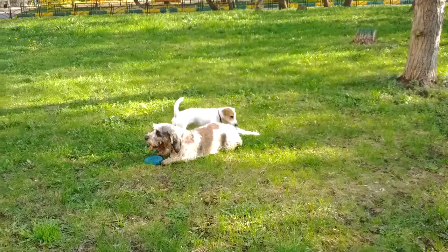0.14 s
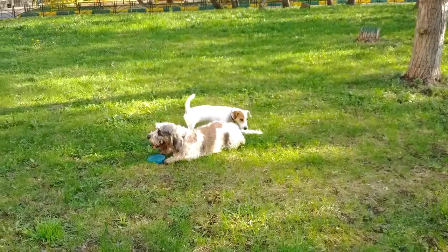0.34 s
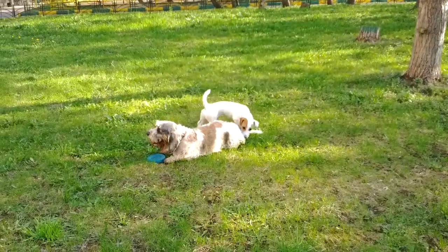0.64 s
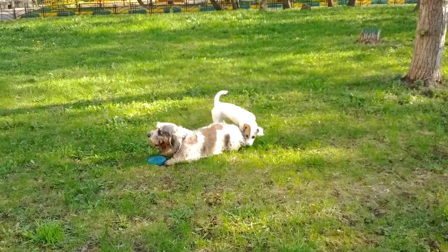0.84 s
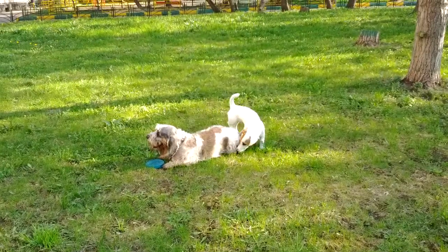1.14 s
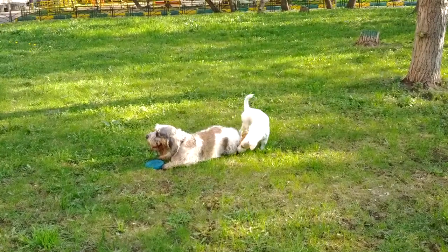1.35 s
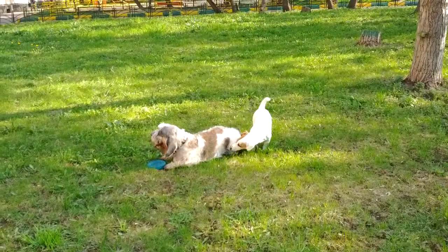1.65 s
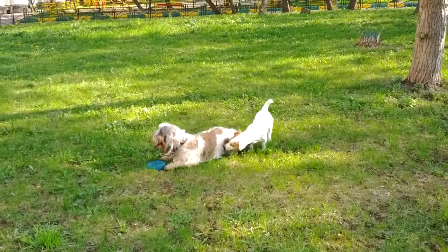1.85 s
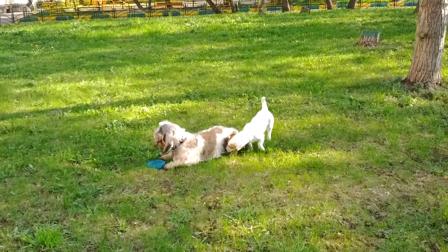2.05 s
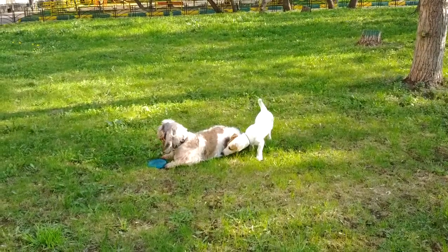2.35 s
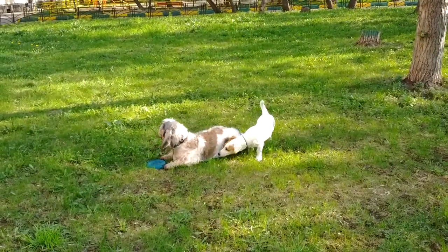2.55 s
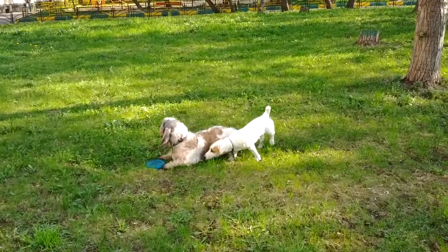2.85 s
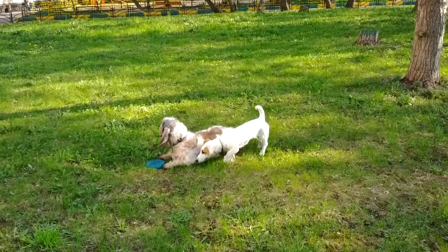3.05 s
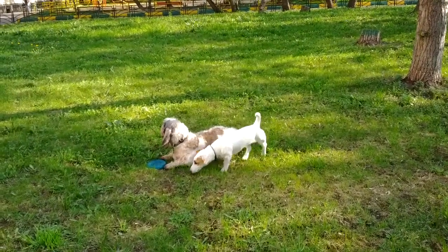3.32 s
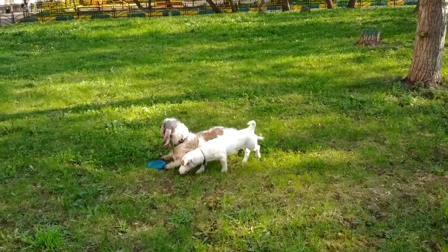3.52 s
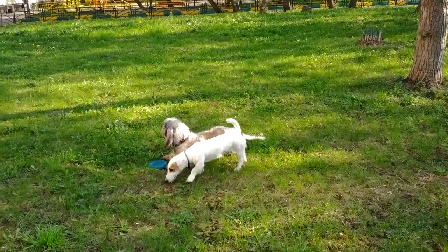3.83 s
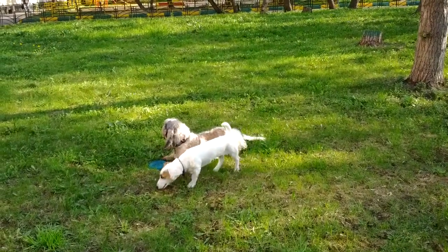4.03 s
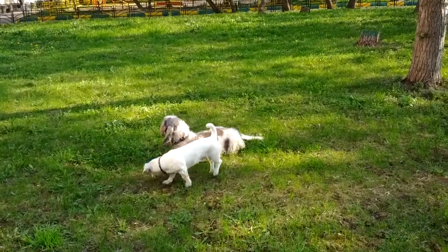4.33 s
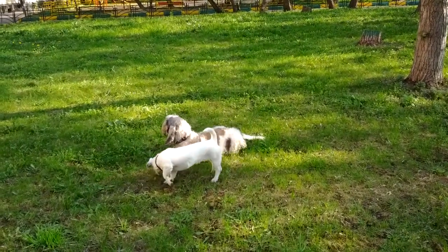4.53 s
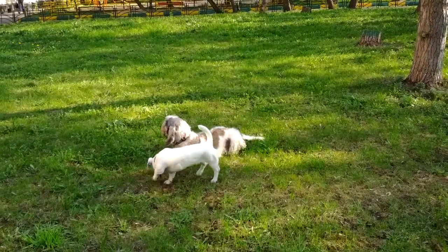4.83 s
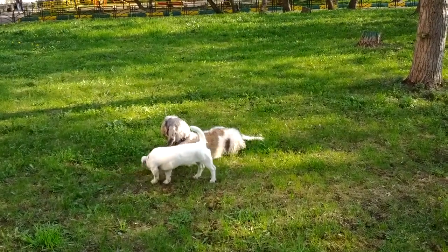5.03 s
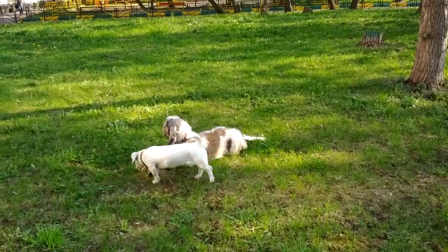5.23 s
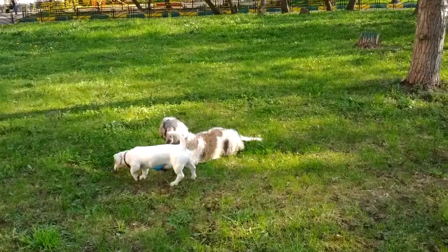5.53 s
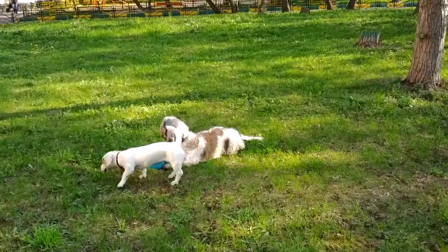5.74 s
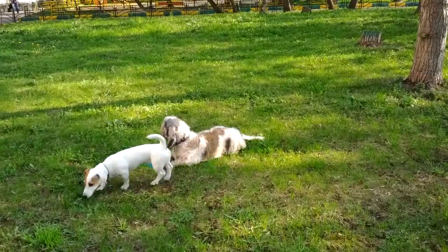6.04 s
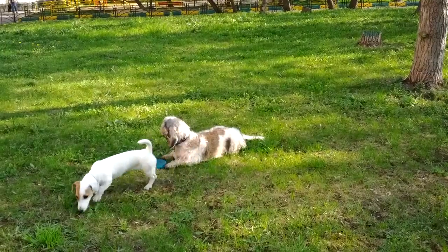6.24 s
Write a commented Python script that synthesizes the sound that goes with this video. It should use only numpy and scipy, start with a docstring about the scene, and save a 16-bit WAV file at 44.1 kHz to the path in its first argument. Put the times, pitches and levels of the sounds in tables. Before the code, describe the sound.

After a tiny silence, outdoor road noise opens: deep rumble, broad tyre roar and airy hiss. Two sparrow chirps sound at about 0.2 and 0.4 seconds. Vehicles pass close at roughly 0.7 and 1.4, their bright hiss overlapping, while another engine's midrange hum peaks near 1.2 and slides slightly down in pitch. A softer pass follows around 2.2. Beneath, a low exhaust drone climbs slowly, strong from 1.5 to 3.5, then falters after 4.3, nearly vanishes around 5, and returns a little lower near 5.8. Sparrows chatter in a quick cluster from 2.45 to 3.4, faintly at 4.0 and 4.3, then in an overlapping burst around 4.85, all with a short diffuse echo. Farther vehicles wash by more quietly to the end. Very faint grass rustles near 4.3, 4.9 and 6.2 and tiny bright ticks, notably at 2.0 and 6.05, come from the dogs. Mono, ending at about 6.4.

```python
"""A lawn in a park beside a road: traffic rumbles as shaped noise; two vehicles hiss past close by, more farther off.
An exhaust drones as a firing tone with overtones, rising slowly in pitch, then fades as the engine eases
off and returns lower; a second engine hums past with a Doppler fall. Sparrows chirp in the trees as gliding
whistles with echoes, and two dogs on the grass make faint ticks and rustles of noise. The sound is mono."""
import sys
import numpy as np
from scipy import signal
from scipy.fft import rfft, irfft, next_fast_len
from scipy.io import wavfile
from scipy.ndimage import uniform_filter1d, map_coordinates

SR = 44100
rng = np.random.default_rng(int(sys.argv[2]) if len(sys.argv) > 2 else 0)


def store_wav(level_fs):
    """Save 16-bit WAV to argv[1]."""
    pcm = np.round(np.clip(np.atleast_2d(level_fs), -1, 1) * 32767)
    wavfile.write(sys.argv[1], SR, pcm.T.astype(np.int16))


N = 281137  # length in samples
TIME_S = np.arange(N) / SR


def amp(db):
    """Level law: 20 dB is a factor of ten in amplitude."""
    return 10 ** (np.asarray(db) / 20)


def unit(x):
    """Normalisation by mean power: scale to rms 1."""
    return x / np.sqrt(np.mean(x ** 2) + 1e-20)


def along(points, hz):
    """Spectral interpolation: (Hz, value) points joined along a logarithmic frequency axis."""
    point_hz, values = np.transpose(points)
    return np.interp(np.log(hz + 1), np.log(point_hz + 1), values)


def curve(rows):
    """Linear interpolation: (s, value) points as one value per sample."""
    return np.interp(TIME_S, *np.transpose(rows))


def swell(closest_s, lasting_s):
    """Distance law of a source driving by: gain 1 when closest, half of that lasting_s before and after."""
    return 1 / (1 + ((TIME_S - closest_s) / lasting_s) ** 2)


def wobble(rate):
    """Random modulation: a smooth curve through normal random knots, rate of them a second."""
    knots = rng.standard_normal(int(N * rate / SR) + 4)
    return map_coordinates(knots, [np.arange(N) * rate / SR])


def filtered(x, response):
    """Linear filtering: the spectrum of x times a response of frequency."""
    m = next_fast_len(N + SR // 2)  # zero padding keeps the end from wrapping round
    spectrum = rfft(x, m) * response(np.fft.rfftfreq(m, 1 / SR))
    return irfft(spectrum, m)[..., :N]


def rush(spectrum, patchy_db):
    """Turbulent noise: coloured, of rms 1, with patches of gain in time and frequency from the moving air."""
    cells = signal.stft(rng.standard_normal(N), nperseg=512)[2]
    across_hz = uniform_filter1d(rng.standard_normal(cells.shape), size=5, axis=0)
    patches = unit(uniform_filter1d(across_hz, size=22, axis=1))
    noise = signal.istft(cells * amp(patchy_db * patches), nperseg=512)[1][:N]
    return unit(filtered(noise, lambda hz: amp(along(spectrum, hz))))


def band(centre_hz, width_hz):
    """Resonance: noise of rms 1 in one peak, width_hz across at half its amplitude."""
    noise = rng.standard_normal(N)
    return unit(filtered(noise, lambda hz: 1 / (1 + ((hz - centre_hz) / width_hz * 2) ** 2)))


def add(track, s, sound):
    """Superposition: mix a short sound into the track at time s."""
    room = track[max(round(s * SR), 0):][:len(sound)]
    room += sound[:len(room)]


# The distant stream of traffic slowly recedes; its rumble and hiss are relative to its roar.
STREAM_DB, STREAM_FADE_DB_PER_S = -44, 0.59
STREAM_RUMBLE_DB, STREAM_HISS_DB = 4.5, -9
# Vehicles going by. Each row: closest in seconds, time to half gain in seconds, rumble in dB, roar in dB,
# hiss in dB, nearness from 0 to 1 (the share of hiss power with the near colour).
VEHICLES = [(.68, 0.53, -48.5, -43.5, -39, 0.99), (1.4, 0.54, -42.5, -44.5, -39, 0.88),
            (2.2, 0.75, -46, -45.5, -45.5, 0.47), (3.05, 0.36, -47.5, -51.5, -53, 0),
            (3.87, 0.56, -56, -50, -49, 0.01), (4.8, 0.76, -56, -55.5, -51, 0.54),
            (5.68, 0.67, -47, -51.5, -53, 0.6)]


def road_levels():
    """Incoherent addition: in rumble, roar, near and far hiss, vehicles add in power to the stream."""
    stream = amp(STREAM_DB - STREAM_FADE_DB_PER_S * TIME_S)
    power = np.outer([amp(STREAM_RUMBLE_DB), 1, 0, amp(STREAM_HISS_DB)], stream) ** 2
    for closest_s, lasting_s, rumble_db, roar_db, hiss_db, nearness in VEHICLES:
        near_gain = amp(hiss_db) * np.sqrt(nearness)
        far_gain = amp(hiss_db) * np.sqrt(1 - nearness)
        gains = [amp(rumble_db), amp(roar_db), near_gain, far_gain]
        power = power + np.outer(gains, swell(closest_s, lasting_s)) ** 2
    return np.sqrt(power)


DEEP_DB = -46  # the deepest rumble carries from far off and stays level
# Noise colours of the deepest rumble, the rumble, the tyre roar, and tyre hiss close by and far off.
# Each row: frequency in Hz, relative density in dB per Hz.
DEEP_SPECTRUM = [(12, -24), (24, -5), (30, -6), (36, -11), (58, -5), (75, -21), (150, -60)]
RUMBLE_SPECTRUM = [(20, -22), (45, -8), (70, 0.5), (105, -0.5), (150, -1.5), (250, -5), (350, -10.5),
                   (500, -20.5), (900, -44.5)]
ROAR_SPECTRUM = [(200, -0.5), (500, -2), (780, 1), (1100, 1), (1450, 0), (1900, -4.5), (2600, -6.5),
                 (4000, -15.5), (8000, -47)]
NEAR_HISS_SPECTRUM = [(1060, -16), (1800, -6.5), (2120, -7.5), (2430, -4), (2760, -4.5), (3370, -1),
                      (4930, -5), (5650, -1.5), (7090, -3.5), (9140, -12.5), (11100, -11), (12700, -18.5),
                      (15800, -45)]
FAR_HISS_SPECTRUM = [(1060, -52), (1800, -22), (2200, -21), (2590, 4), (3160, -2.5), (3620, 1.5),
                     (4420, 1.5), (4800, 4), (5250, -0.5), (7020, 0.5), (8570, -12), (10700, -10.5),
                     (12800, -23), (15200, -26), (15800, -41)]


def traffic():
    """Broadband road noise: rumble and tyre roar, and a hiss that is brighter while a vehicle is near."""
    rumble_gain, roar_gain, near_gain, far_gain = road_levels()
    deep = amp(DEEP_DB) * rush(DEEP_SPECTRUM, patchy_db=0.0)
    rumble = rumble_gain * rush(RUMBLE_SPECTRUM, patchy_db=1.0)
    roar = roar_gain * rush(ROAR_SPECTRUM, patchy_db=0.82)
    near_hiss = near_gain * rush(NEAR_HISS_SPECTRUM, patchy_db=1.5)
    far_hiss = far_gain * rush(FAR_HISS_SPECTRUM, patchy_db=1.7)
    return deep + rumble + roar + near_hiss + far_hiss


# The overtones carry only while the engine is near, over a faint remainder.
THROB_S, THROB_LASTING_S, THROB_DB, THROB_FAR_DB = 1.35, 1.4, -40.5, -54
# The passing engine. Each row: time in seconds, firing rate in Hz.
FIRING_RATE = [(0, 42.8), (.6, 43.78), (1, 45.32), (1.5, 47.18), (2, 48.56), (2.7, 50.24), (3.4, 50.6),
               (4.2, 52.75), (4.9, 49.9), (5.5, 49.24), (6.37, 47.9)]
# The exhaust's fundamental. Each row: time in seconds, level in dB before it wavers.
DRONE_LEVEL = [(0.0, -34.5), (0.7, -43), (0.9, -34.5), (1.3, -34.5), (1.55, -30.5), (2.8, -31.5),
               (3.55, -33), (4.0, -39.5), (4.3, -32.5), (4.44, -46), (5.15, -51), (5.27, -39), (5.52, -42),
               (5.8, -34), (6.37, -35.5)]
# Exhaust colour. Each row: frequency in Hz, relative overtone level in dB.
PIPE_COLOUR = [(90, 0.5), (140, -3), (190, -6), (240, -8), (290, -14), (400, -24), (600, -28)]


def exhaust(waver_db=-53, scatter_db=3, smear=0.19):
    """Harmonic series on the firing rate; overtones fade in and out as the paths from the road shift."""
    firing_hz = curve(FIRING_RATE)
    phase = 2 * np.pi * np.cumsum(firing_hz) / SR
    # an added waver of fixed size shows most where the tone is weak
    drone_gain = amp(curve(DRONE_LEVEL)) + amp(waver_db) * wobble(10)
    drone = drone_gain * unit(np.sin(phase))
    overtones = np.zeros(N)
    for k in range(2, 12):
        gain = amp(along(PIPE_COLOUR, k * firing_hz) + scatter_db * wobble(4.85))
        drift = smear * np.sqrt(k) * wobble(9.8)  # radians
        overtones += gain * np.sin(k * phase + rng.uniform(0, 2 * np.pi) + drift)
    throb_gain = np.hypot(amp(THROB_DB) * swell(THROB_S, THROB_LASTING_S), amp(THROB_FAR_DB))
    return drone + throb_gain * unit(overtones)


# Narrow bands, engine booms low and tyre tread high. Each row: centre in Hz, width in Hz,
# level when loudest in dB, loudest at in seconds, time to half gain in seconds.
PASSING_BANDS = [(102.3, 28, -47, 5.7, 2.6), (174, 29, -44, 0.41, 0.26), (205, 78, -44.5, 2.09, 0.39),
                 (185, 75, -45.5, 3.79, 0.27), (134, 45, -45.5, 3.23, 0.31), (280, 61, -47, 0.63, 0.52),
                 (392, 137, -47, 0.29, 0.69), (1200, 450, -48.5, 1.0, 0.21), (2480, 280, -51, 0.63, 0.22),
                 (2450, 380, -47, 1.45, 0.57), (4740, 300, -62, 4.8, 0.81), (5600, 700, -51, 0.71, 0.15)]


def passing():
    """Resonance and distance: each narrow band swells and fades as its vehicle goes by."""
    return sum(amp(db) * band(hz, width_hz) * swell(closest_s, lasting_s)
               for hz, width_hz, db, closest_s, lasting_s in PASSING_BANDS)


HUM_HZ, HUM_DB = 232.5, -44  # pitch and level when closest
HUM_DOPPLER = .04  # share by which the pitch is raised far ahead and lowered far behind
HUM_S, HUM_LASTING_S = 1.15, 0.665  # closest at, time to half gain


def second_engine(smear=0.56, flutter_db=2.5):
    """Doppler effect: an unsteady hum sinks in pitch as its vehicle goes by, swelling when closest."""
    ahead = (HUM_S - TIME_S) / HUM_LASTING_S
    approach = ahead / np.hypot(1, ahead)  # share of the speed directed at the listener
    pitch_hz = HUM_HZ * (1 + HUM_DOPPLER * approach)
    phase = 2 * np.pi * np.cumsum(pitch_hz) / SR + smear * wobble(14)
    hum = unit(np.sin(phase) * amp(flutter_db * wobble(9.8)))
    return amp(HUM_DB) * swell(HUM_S, HUM_LASTING_S) * hum


# The sparrows' four notes, by name. Each row: time after the note's start in seconds,
# nominal pitch in Hz, relative level in dB.
NOTES = { "chilip": [(0, 4800, -15), (.005, 5300, -10), (.008, 5900, -2), (.011, 5400, -9),
         (.014, 4400, -17), (.022, 4270, -6), (.033, 4130, 0), (.038, 3900, -6), (.043, 3500, -18),
         (.049, 3550, -24), (.055, 3750, -8), (.064, 4080, -2), (.069, 4400, -14), (.073, 3950, -7),
         (.082, 3350, -13)], "cheerup": [(0, 3650, -14), (.005, 4150, -6), (.013, 4750, -4),
         (.023, 4550, -1), (.029, 4750, -6), (.032, 5350, -9), (.035, 4200, -6), (.039, 3600, -5),
         (.044, 3900, -22), (.048, 4250, -13), (.054, 3600, -14), (.061, 3150, -13), (.068, 3250, -17),
         (.073, 3600, -6), (.078, 3850, -1), (.082, 4250, -15), (.086, 3800, -10), (.091, 3050, -14),
         (.099, 3300, -15)], "tsip": [(0, 5630, -20), (.005, 6200, -5), (.009, 6700, -14),
         (.02, 6800, -20)], "tsew": [(0, 5830, -9), (.006, 5700, -1), (.016, 5200, -7), (.026, 5130, -22),
         (.034, 4950, -5), (.04, 4500, -12)], }
# The sparrows' calls. Each row: start in seconds, level in dB, echo relative to the call in dB,
# growth over the call in dB, note name.
CHIRPS = [(0.186, -41, -10, 2, "cheerup"), (0.357, -38, -12, -6, "chilip"), (2.45, -38, -7, 0, "chilip"),
          (2.799, -36, -8, 0, "tsip"), (2.857, -37.5, -8, 3, "cheerup"), (3.043, -37.5, -5, 0, "chilip"),
          (3.08, -45, -7, 0, "tsew"), (3.366, -36, -6, 0, "tsip"), (4.02, -48, -6, 2, "chilip"),
          (4.308, -46.5, -6, 4, "chilip"), (4.84, -40.5, -3, -2, "chilip"), (4.881, -46, -4, 0, "tsew"),
          (4.899, -42.5, -3, 3, "cheerup")]


def sparrows(overtone_db=-16, echo_t60=0.45, echo_delay_s=.008, flutter_db=2.0):
    """Frequency modulation: fluttering, gliding whistles with weak overtones, scattered by trunks and walls."""
    song = np.zeros(N)
    tail_t = np.arange(SR // 2) / SR
    for start_s, db, echo_db, growth_db, note in CHIRPS:
        knots_s, pitch_hz, shape_db = np.transpose(NOTES[note])
        t = np.arange(int(knots_s[-1] * SR)) / SR
        detune = 1 + 0.0046 * rng.standard_normal()  # each call lies slightly off pitch
        phase = 2 * np.pi * np.cumsum(np.interp(t, knots_s, pitch_hz)) / SR * detune
        overtones = np.sin(2 * phase) + .5 * np.sin(3 * phase)
        whistle = np.sin(phase) + amp(overtone_db) * overtones
        flutter = flutter_db * wobble(294)[:len(t)]
        level_db = db + np.interp(t, knots_s, shape_db) + growth_db * t / t[-1] + flutter
        call = amp(level_db) * whistle * signal.windows.tukey(len(t), .08)
        tail = rng.standard_normal(len(tail_t)) * amp(-60 * tail_t / echo_t60)
        echo = signal.fftconvolve(call, tail / np.linalg.norm(tail))
        add(song, start_s, call)
        add(song, start_s + echo_delay_s, amp(echo_db) * echo)
    return song


# Ticks from the dogs on the grass. Each row: start in seconds, level at the onset in dB,
# centre in Hz, width in Hz, time to decay by 60 dB in seconds.
TICKS = [(1.931, -54, 15200, 2500, .05), (1.996, -40.5, 14200, 3200, .016),
         (3.208, -54, 12500, 7000, 0.012), (3.256, -51.5, 13000, 6000, .014),
         (4.195, -50, 12500, 5000, .014), (5.144, -49.5, 13000, 7000, .014),
         (5.925, -52.5, 10500, 9000, 0.0085), (6.052, -46, 11060, 6000, 0.026),
         (6.079, -48, 12300, 9000, 0.0097), (6.085, -53, 8000, 4000, .016)]


def grass_ticks():
    """Exponential decay: tiny bright snaps of band noise that die within milliseconds."""
    ticks = np.zeros(N)
    t = np.arange(SR // 20) / SR
    for start_s, db, hz, width_hz, t60 in TICKS:
        add(ticks, start_s, amp(db - 60 * t / t60) * band(hz, width_hz)[:len(t)])
    return ticks


# Crackle of the grass. Each row: frequency in Hz, relative density in dB per Hz.
BLADES_SPECTRUM = [(3000, -27), (6000, -5), (9500, 3), (11500, -2), (13000, -10), (15500, -18)]
# Rustles. Each row: loudest at in seconds, time to half gain in seconds, level when loudest in dB.
RUSTLES = [(4.28, 0.12, -60), (4.9, 0.44, -63.5), (6.2, .25, -67.5)]


def rustle(clumpy_db=1, grainy_db=3.5):
    """Amplitude-modulated noise: blades of grass crackle faintly under the walking dog."""
    grain = amp(clumpy_db * wobble(18) + grainy_db * wobble(400))
    crackle = unit(rush(BLADES_SPECTRUM, patchy_db=1) * grain)
    return crackle * sum(amp(db) * swell(loudest_s, lasting_s) for loudest_s, lasting_s, db in RUSTLES)


def scene():
    """Superposition: all sources add and arrive centred, the same in both ears."""
    road = traffic() + exhaust() + passing() + second_engine()
    lawn = sparrows() + grass_ticks() + rustle()
    mid = road + lawn
    return np.array([mid, mid])


START_S, TOP_HZ = .052, 15850  # silence before the sound opens, upper band limit


def record(dry):
    """Gating and band limiting: the sound opens after a moment and keeps nothing above TOP_HZ."""
    opened = uniform_filter1d(1.0 * (TIME_S > START_S), size=64)  # a ramp of 64 samples
    return filtered(dry * opened, lambda hz: hz < TOP_HZ)


dry = scene()
out = record(dry)
store_wav(out)
```